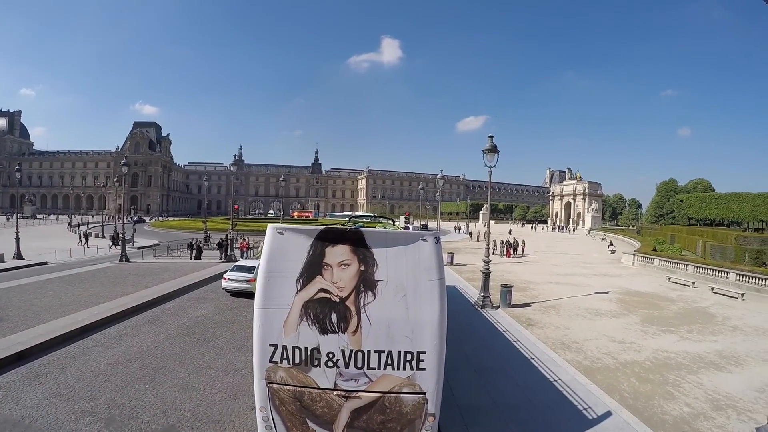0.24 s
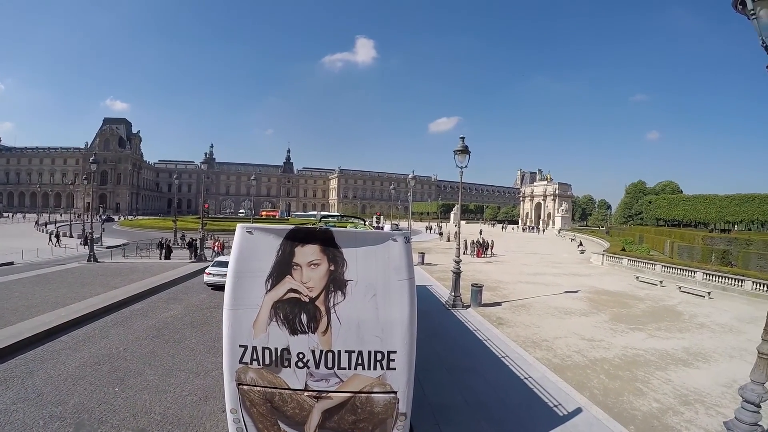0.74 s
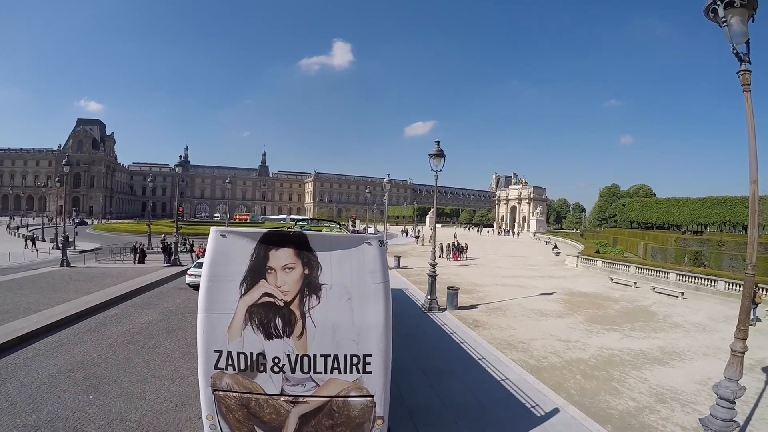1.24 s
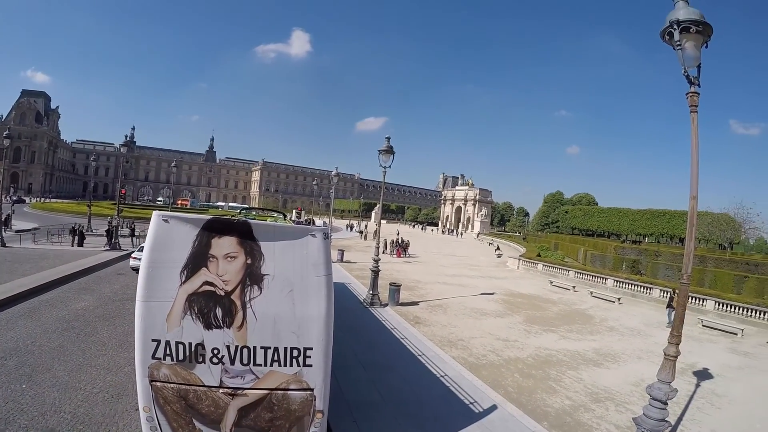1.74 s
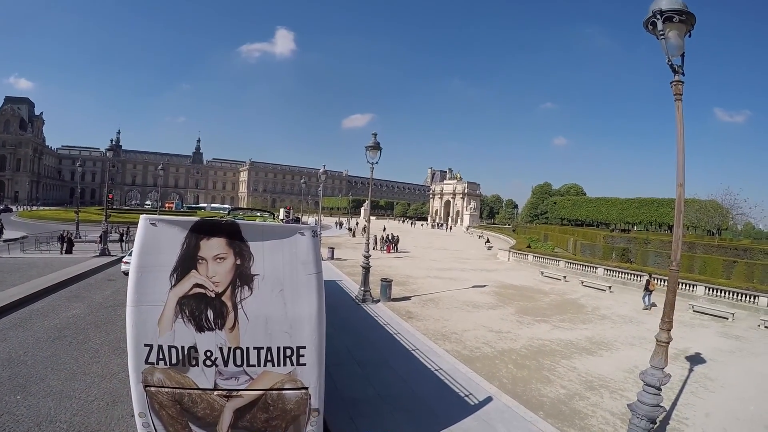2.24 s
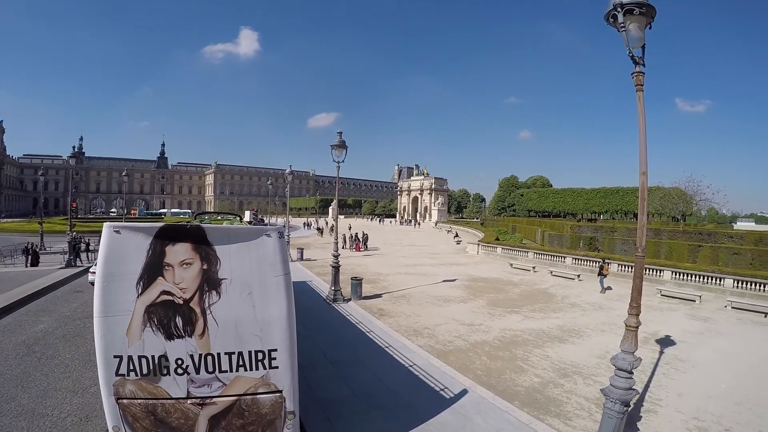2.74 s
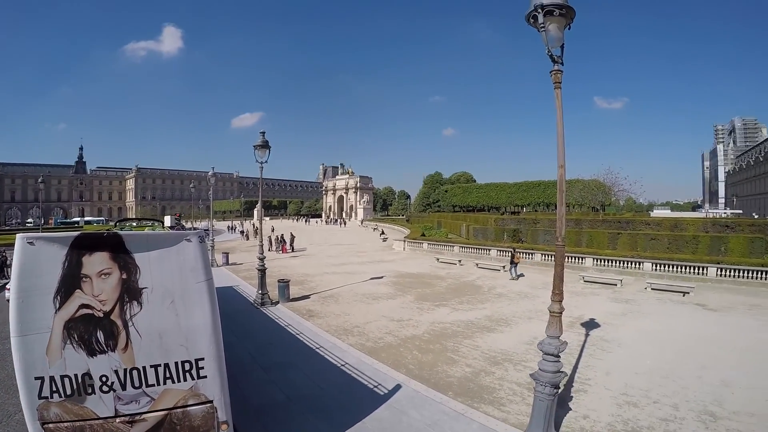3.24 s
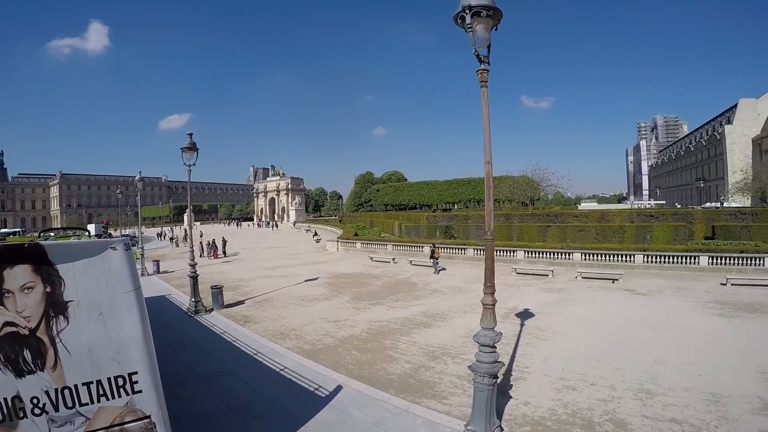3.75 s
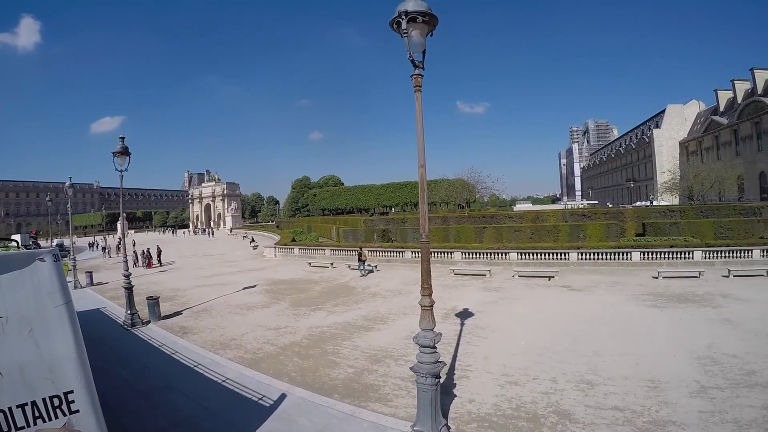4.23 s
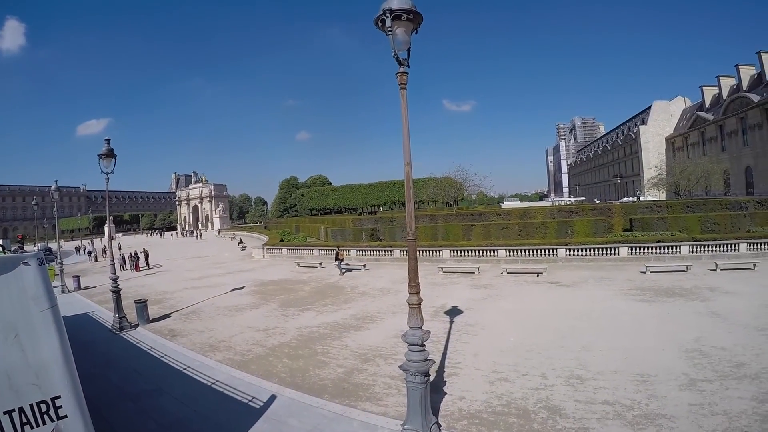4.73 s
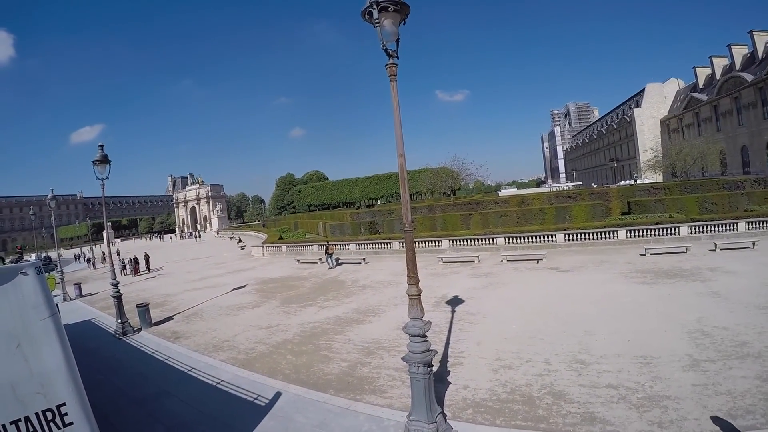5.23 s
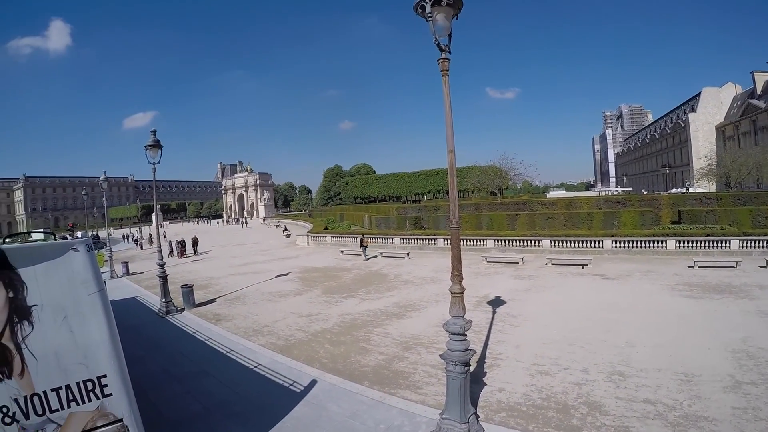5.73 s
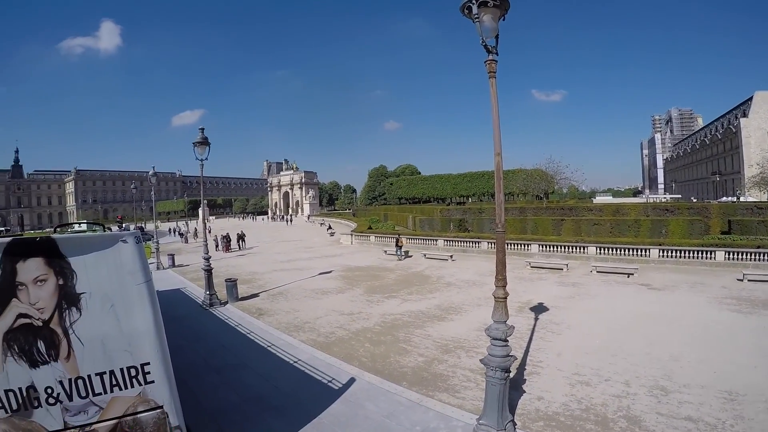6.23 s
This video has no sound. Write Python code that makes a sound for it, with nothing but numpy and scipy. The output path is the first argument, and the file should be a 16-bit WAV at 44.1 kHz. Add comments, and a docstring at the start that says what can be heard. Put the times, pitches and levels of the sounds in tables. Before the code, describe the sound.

Outdoors on a vehicle's open deck, a big diesel idles evenly throughout: about thirty small metallic knocks per second, uneven in strength and repeating five times a second, with mid-range clatter, belt whirr, two faint wavering whines and fine hiss. Deep wind rumble flutters on the close microphone, swelling near 1.5, 3.2, 5.7 and 6.2 s. Handling sounds stand far above this bed. At 1.2 s a bright, hard double clack hits the plastic housing with a thump; at 1.7 s comes a softer knock and thud. A tiny tick and scuff fall at 2.4 s. From 3.0 to 3.4 s there are dull bumps and light scratching, then a heavy thump at 3.9 s and another at 4.2 s. The whirr gains and the knocking and hiss recede slightly towards 4.1 s, then partly reverse. After a faint tap at 5.8 s, engine and wind continue to 6.5 s.

```python
"""Open deck of a bus: its six-cylinder diesel idles at 600 rpm while a small camera is slowly turned.
Wind rumbles on the microphone as shaped low noise.
Firing blows ring the block; noise bands give belt whirr, hiss and clatter, wandering sines two thin whines.
Handling knocks ring the camera's housing, scratch it and thump its springy mount."""
import sys
import numpy as np
from scipy import signal
from scipy.fft import rfft, irfft, next_fast_len
from scipy.io import wavfile
from scipy.ndimage import uniform_filter1d, map_coordinates

SR = 44100
rng = np.random.default_rng(int(sys.argv[2]) if len(sys.argv) > 2 else 0)


def generate_wav(signal):
    """Clip the signal to [-1, 1] and save it as 16-bit WAV at the path in sys.argv[1]."""
    frames = np.transpose(np.atleast_2d(signal))
    scaled = np.clip(frames, -1, 1) * 32767
    pcm = np.round(scaled).astype(np.int16)
    wavfile.write(sys.argv[1], SR, pcm)


N = 285768
TIME_S = np.arange(N) / SR
CYCLE_HZ = 5.001  # engine cycle, two crank turns
CYLINDER_COUNT = 6


def amp(db):
    """Decibels to gain."""
    return 10 ** (np.asarray(db) / 20)


def unit(x):
    """x at rms 1."""
    return x / np.sqrt(np.mean(x ** 2) + 1e-20)


def curves(rows):
    """One value per sample for each column after the time."""
    time_s, *columns = np.transpose(rows)
    return [np.interp(TIME_S, time_s, column) for column in columns]


def wobble(rate_hz):
    """Smooth random curve, rate_hz knots a second."""
    knots = rng.standard_normal(int(N * rate_hz / SR) + 4)
    return map_coordinates(knots, [np.arange(N) * rate_hz / SR])


def filtered(x, response):
    """x through a complex response of frequency."""
    size = next_fast_len(len(x) + 8192)
    spectrum = rfft(x, size) * response(np.fft.rfftfreq(size, 1 / SR))
    return irfft(spectrum, size)[:len(x)]


def resonance(f, centre_hz, width_hz):
    """Causal response of one mode, gain 1 at its centre."""
    damping = 1j * f * width_hz
    return damping / (centre_hz ** 2 - f ** 2 + damping)


def noise(spectrum):
    """Noise of rms 1, its spectrum interpolated over log frequency."""
    hz, db = np.transpose(spectrum)
    shape = lambda f: amp(np.interp(np.log(f + 1), np.log(hz), db))
    return unit(filtered(rng.standard_normal(N), shape))


def add(track, time_s, sound):
    """Mix a sound into the track, cut at its end."""
    part = track[round(time_s * SR):][:len(sound)]
    part += sound[:len(part)]


# wind strength before flutter: (time [s], level [dB])
WIND_GUSTS = [(0, -45), (.72, -41), (1.08, -47), (1.5, -39.5), (1.88, -42.5), (2.2, -42), (2.42, -47.5),
              (2.7, -43), (3.2, -37.5), (3.6, -44), (3.82, -41), (4.1, -45), (4.5, -43.5), (5.38, -47),
              (5.65, -41.5), (5.92, -47), (6.2, -39), (6.48, -45.5)]
# rumble spectrum: (frequency [Hz], relative density [dB])
RUMBLE_SPECTRUM = [(12, -12.5), (22, -1.5), (36, 6), (56, -5.5), (82, -2.5), (97, -13.5), (115, -28.5),
                   (200, -31), (270, -27.5), (400, -53), (900, -64)]


def wind(smoothing_samples=6000, flutter_db=2, flutter_hz=9):
    """Eddies buffet the microphone, following the gusts and fluttering within them."""
    gust_db, = curves(WIND_GUSTS)
    eddies = noise(RUMBLE_SPECTRUM)
    power = np.abs(uniform_filter1d(eddies ** 2, smoothing_samples))
    evened = eddies / np.sqrt(power + 0.15)  # gusts, not chance, set the swell
    return amp(gust_db + flutter_db * wobble(flutter_hz)) * evened


def firing_pulse():
    """Cosine at the firing rate, peaking 6 ms after each nominal firing."""
    return np.cos(2 * np.pi * CYLINDER_COUNT * CYCLE_HZ * (TIME_S - .006))


# clatter spectrum: (frequency [Hz], relative density [dB])
CLATTER_SPECTRUM = [(100, 9), (300, -6), (520, -8.5), (680, -7.5), (850, -2), (1000, -1), (1200, -2.5),
                    (1450, -8.5), (1700, 3), (2150, -5.5), (2430, -5), (2750, 5), (3200, -7.5), (3600, -39)]


def clatter():
    """Mid-band engine and street noise pulsing slightly at the firing rate."""
    level_db = -53.5 + 0.55 * firing_pulse() + 0.35 * wobble(25)
    return amp(level_db) * noise(CLATTER_SPECTRUM)


# hiss spectrum: (frequency [Hz], relative density [dB])
HISS_SPECTRUM = [(2600, -7.5), (3200, -7), (3500, -0.5), (3750, -2), (4050, 2.5), (4550, -2), (4950, -13),
                 (5400, -8), (6200, -16), (6900, -3), (7700, -17), (10500, -21.5), (15000, -35.5)]


def hiss():
    """Treble engine and street noise pulsing at the firing rate."""
    return amp(0.58 * firing_pulse() + 0.64 * wobble(14)) * noise(HISS_SPECTRUM)


# thin tones: (frequency [Hz], level re whirr base [dB], wander [Hz])
WHINE_TONES = [(720, -9.5, 7), (2260, -10.5, 5)]


def whines():
    """Sines whose pitch and level wander."""
    tones = np.zeros(N)
    for hz, level_db, wander_hz in WHINE_TONES:
        phase = 2 * np.pi * np.cumsum(hz + wander_hz * wobble(20)) / SR
        tones += amp(level_db + 1.1 * wobble(5.7)) * unit(np.sin(phase))
    return tones


# whirr spectrum: (frequency [Hz], relative density [dB])
WHIRR_SPECTRUM = [(1250, -50), (1520, -5), (1640, 10), (1760, 14), (1900, 8), (2100, 9), (2300, 1.5),
                  (2600, -20.5)]


def belt(rub_at_cycles=0.585, rub_width_cycles=0.041, rub_db=-6.5):
    """Belt drive: whirring noise, plus a resonant rub once in each engine cycle."""
    phase_cycles = TIME_S * CYCLE_HZ % 1
    window = np.exp(-.5 * ((phase_cycles - rub_at_cycles) / rub_width_cycles) ** 2)
    rub = window * rng.standard_normal(N)
    chirr = unit(filtered(rub, lambda f: resonance(f, 1753, 133) ** 2))
    return amp(2) * noise(WHIRR_SPECTRUM) + amp(rub_db) * chirr


# block resonances: (frequency [Hz], width [Hz], level [dB], delay after firing [s])
BLOCK_MODES = [(1133, 35.6, -3, 0.0027), (1736, 23, -0.5, 0.0016), (2713, 86, -2, 0.0018),
               (3993, 31, -10, 0), (4425, 75, -11, .003), (6990, 70, -13.5, 0)]
# cylinders in firing order: (thud into lowest block mode [dB], tick into higher modes [dB])
CYLINDER_BLOWS = [(-5, 1), (-11, -2.5), (-11, 0.5), (-9.5, 3), (-10.5, -9.5), (-9, 3)]
THUD_BELOW_HZ = 1500


def diesel_knock(scatter_db=1.7, jitter_s=.0003, rattle_share=.022, rattle_decay_s=.005):
    """Each firing is a sharp blow and short rattle ringing the block; cylinder strengths repeat each cycle."""
    firing_hz = CYCLE_HZ * CYLINDER_COUNT
    firings = np.arange(int(N / SR * firing_hz))
    times_s = firings / firing_hz + jitter_s * rng.standard_normal(len(firings))
    decay = np.exp(-np.arange(SR // 30) / SR / rattle_decay_s)
    thuds_db, ticks_db = np.transpose(CYLINDER_BLOWS)
    rings = np.zeros(N)
    for hz, width_hz, level_db, delay_s in BLOCK_MODES:
        strikes_db = thuds_db if hz < THUD_BELOW_HZ else ticks_db
        blow_db = strikes_db[firings % CYLINDER_COUNT] + scatter_db * rng.standard_normal(len(firings))
        blows = np.zeros(N)
        blows[np.clip(((times_s + delay_s) * SR).astype(int), 0, N - 1)] = amp(blow_db)
        rattle = rattle_share * signal.fftconvolve(blows, decay)[:N] * rng.standard_normal(N)
        mode = lambda f: resonance(f, hz, width_hz) * resonance(f, hz, 4 * width_hz)
        rings += amp(level_db) * unit(filtered(blows + rattle, mode))
    return rings


# camera swing and part return: (time [s], share of full turn [0-1])
CAMERA_TURN = [(0, 0), (1.25, 0.035), (2.75, 0.34), (4.1, 0.78), (5.3, 0.68), (6.48, 0.42)]
# base level at zero turn, change over a full turn
RING_DB, RING_TURN_DB = -58.5, -4.5
WHIRR_DB, WHIRR_TURN_DB = -59.5, 6
HISS_DB, HISS_TURN_DB = -55.5, -3


def engine():
    """Idling diesel: the camera's turn rebalances knock, belt with whines, and hiss; clatter stays put."""
    turn, = curves(CAMERA_TURN)
    ring = amp(RING_DB + RING_TURN_DB * turn) * diesel_knock()
    whirr = amp(WHIRR_DB + WHIRR_TURN_DB * turn) * (belt() + whines())
    treble = amp(HISS_DB + HISS_TURN_DB * turn) * hiss()
    return ring + whirr + treble + clatter()


# mount jolts: (time [s], level [dB], shove [dB], ring length re free bounce [ratio])
MOUNT_JOLTS = [(1.233, -21.5, -26, 0.81), (1.687, -28, 16, 0.21), (1.709, -14.5, -30, 0.41),
               (3.107, -19.5, -10, 0.73), (3.156, -22.5, -6, 0.88), (3.42, -22, 4.5, 0.81),
               (3.8858, -14.5, -2.5, 0.81), (4.2247, -18, -18, 0.74)]
# sway, bounce, upper mode: (frequency [Hz], level [dB], free t60 [s], share of shove [ratio])
MOUNT_MODES = [(49, 10, 0.08, 0.82), (82.5, 0, 0.28, 0.058), (254, -7.5, 0.069, 0.47)]


def thumps(rise_s=0.0049):
    """Jolted mount rings as decaying sines; the shove weights mainly its sway and upper mode."""
    track, t = np.zeros(N), np.arange(SR // 3) / SR
    for time_s, level_db, shove_db, length in MOUNT_JOLTS:
        bounce = np.zeros(len(t))
        for hz, mode_db, t60_s, share in MOUNT_MODES:
            decay_db = mode_db + share * shove_db - 60 * t / (t60_s * length)
            bounce += amp(decay_db) * np.sin(2 * np.pi * hz * t)
        add(track, time_s, amp(level_db) * bounce * (1 - np.exp(-t / rise_s)))
    return track


# housing contacts: (time [s], ring peak [dB], brightness [Hz], pitch of spot hit [Hz])
CONTACTS = [(1.2154, -15.5, 2380, 702), (1.2279, -12, 3800, 1234), (1.6764, -24.5, 1505, 680),
            (1.7043, -39, 700, 780), (2.413, -42, 1600, 1060), (3.042, -34.5, 2400, 1540),
            (3.1026, -28, 258, 365), (3.1111, -31.5, 304, 382), (3.1505, -31, 280, 298),
            (3.407, -23.5, 323, 362), (3.416, -33, 340, 790), (3.8743, -22, 790, 950),
            (3.882, -22.5, 148, 261.5), (4.2183, -28.5, 505, 360), (5.835, -44, 600, 690)]
# light scuffs: (time [s], scratch level [dB])
LIGHT_SCUFFS = [(2.412, -42.5), (3.3415, -38.5)]
# dry scratch spectrum: (frequency [Hz], relative density [dB])
GRIT_SPECTRUM = [(600, -4), (1200, 4.5), (1800, 6.5), (2400, -4), (3000, 5), (3800, -2), (4700, -4),
                 (8000, -20), (15000, -51)]
GRIT_DB, GRIT_GROWTH = -28, 0.7  # scratch of a 0 dB contact; scratch dB per contact dB


def scratches(decay_s=0.0073):
    """Each contact scratches the housing briefly, harder ones more; a scuff does nothing else."""
    track, t = np.zeros(N), np.arange(SR // 10) / SR
    events = [(time_s, GRIT_DB + GRIT_GROWTH * peak_db) for time_s, peak_db, _, _ in CONTACTS]
    for time_s, level_db in events + list(LIGHT_SCUFFS):
        add(track, time_s, amp(level_db) * np.exp(-t / decay_s))
    return track * noise(GRIT_SPECTRUM)


# housing modes: (frequency [Hz], width [Hz], level [dB])
HOUSING_MODES = [(241, 49, 0.5), (308, 112, -7), (414, 52, -0.5), (651, 96, -2.5), (802, 97, 1),
                 (1031, 37, 2), (1137, 40, 4.5), (1653, 143, -3.5), (2070, 86, -4), (2580, 230, -11),
                 (3020, 146, -1.5), (3640, 105, -1.5)]
NODE_HZ, NODE_WIDTH_HZ = 510, 130  # microphone sits on a node here
SCRAPE_SHARE, SCRAPE_DECAY_S = .024, .003  # scrape re blow


def housing(f):
    """Response of the housing: modes of alternating sign, notched at the node."""
    modes = sum((-1) ** k * amp(level_db) * resonance(f, hz, width_hz)
                for k, (hz, width_hz, level_db) in enumerate(HOUSING_MODES))
    return modes * (1 - resonance(f, NODE_HZ, NODE_WIDTH_HZ))


def knocks(shell_hz=4100, spot_gain=1.6, spot_width=0.058):
    """A blow and brief scrape ring the housing; dull contacts favour the low modes."""
    track, t = np.zeros(N), np.arange(SR // 5) / SR
    shell = signal.butter(4, shell_hz, fs=SR, output="sos")
    for time_s, peak_db, bright_hz, spot_hz in CONTACTS:
        scrape = SCRAPE_SHARE * np.exp(-t / SCRAPE_DECAY_S) * rng.standard_normal(len(t))
        force = (t == 0) + scrape
        # spot hit favours modes near its pitch
        spot = lambda f: 1 + spot_gain * resonance(f, spot_hz, spot_width * spot_hz)
        softness = lambda f: 1 / (1 + 1j * f / bright_hz) ** 2
        ring = filtered(force, lambda f: housing(f) * spot(f) * softness(f))
        ring = signal.sosfilt(shell, ring)
        add(track, time_s, amp(peak_db) * ring / np.abs(ring).max())
    return track


def scene():
    """Everything at the one microphone."""
    mix = wind() + engine() + thumps() + scratches() + knocks()
    return mix[None]


def record(dry, top_hz=15250):
    """The camera keeps nothing above its band limit."""
    return np.array([filtered(channel, lambda f: f < top_hz) for channel in dry])


dry = scene()
out = record(dry)
generate_wav(out)
```